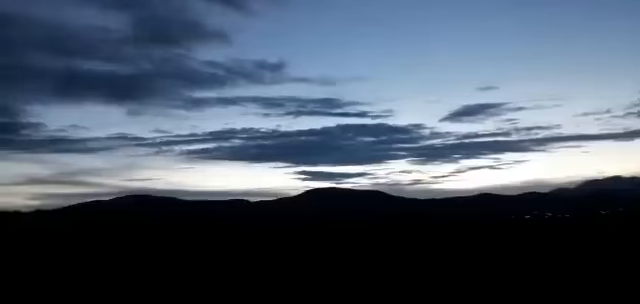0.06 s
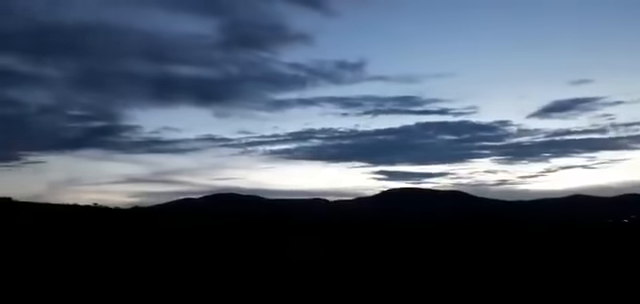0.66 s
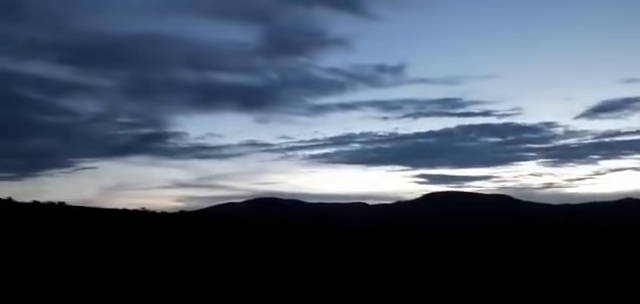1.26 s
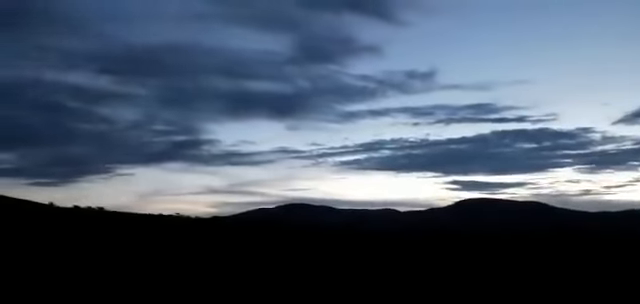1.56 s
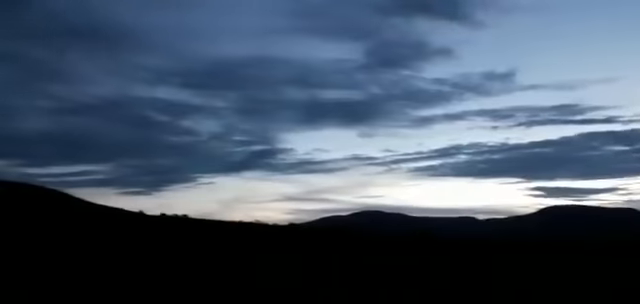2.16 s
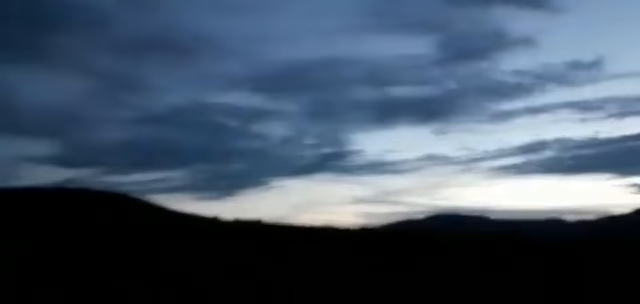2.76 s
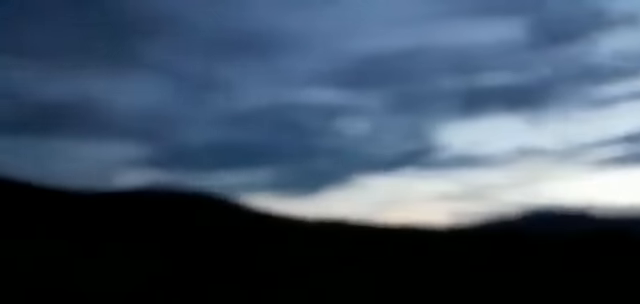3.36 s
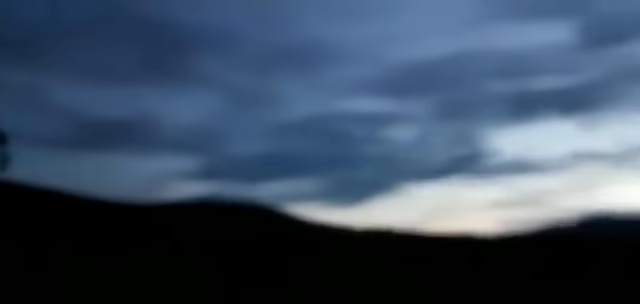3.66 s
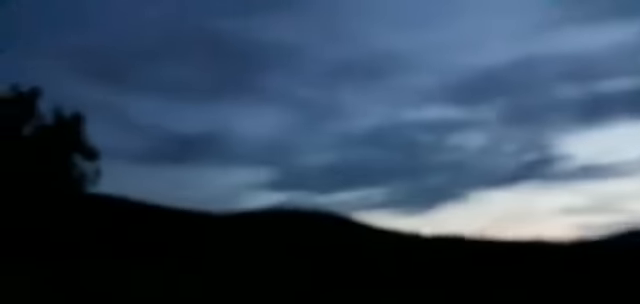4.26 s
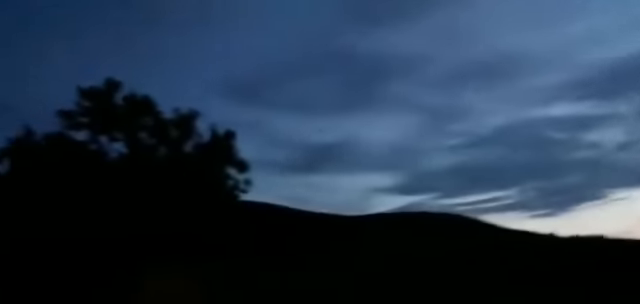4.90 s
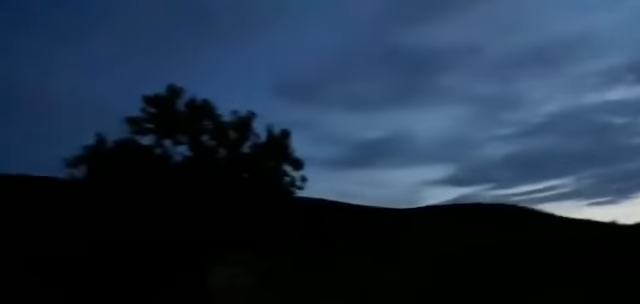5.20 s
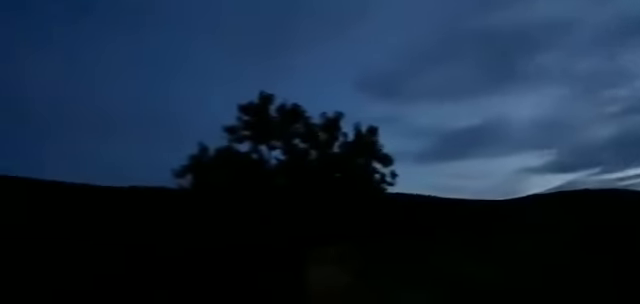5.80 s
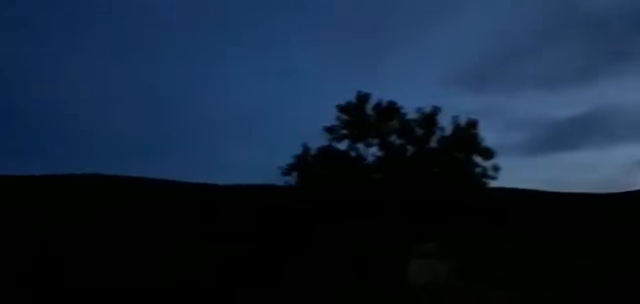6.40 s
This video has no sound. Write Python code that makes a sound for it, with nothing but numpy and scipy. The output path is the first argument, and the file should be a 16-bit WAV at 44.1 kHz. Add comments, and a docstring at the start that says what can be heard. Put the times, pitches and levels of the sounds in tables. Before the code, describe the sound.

A close bird opens with clear downward whistles, a fast trill and a string of short chips, lightly echoed by the surrounding hills. In the second half only farther birds remain, giving thin high chirps and a few faint mellow notes over a soft outdoor hiss. The hand-held microphone picks up occasional dull finger thuds, ticks and rubs, strongest just before the end.

```python
"""Open hill country at dawn, heard from a hand-held camera.
A near songbird sings falling whistles, a quick trill and a run of chips; others add high arches,
flicks and mellow notes over a far chorus. Each note is a gliding, nearly pure tone, echoed by ground
and trees. Underneath lie faint hiss and rumble, while fingers bump, rub and flex the camera case."""
import sys
import numpy as np
from scipy import signal
from scipy.fft import rfft, irfft
from scipy.io import wavfile

SR = 44100
rng = np.random.default_rng(int(sys.argv[2]) if len(sys.argv) > 2 else 0)


def master_out(mix):
    """Clip the mix to full scale and print it as 16-bit PCM to the path in sys.argv[1]."""
    frames = np.transpose(np.atleast_2d(mix))
    ceiling = np.clip(frames, -1, 1)
    pcm = np.round(ceiling * 32767).astype(np.int16)
    wavfile.write(sys.argv[1], SR, pcm)


N = 292824
T = np.arange(N) / SR


def undb(db):
    """Decibels to gain."""
    return 10 ** (np.asarray(db) / 20)


def unit(x):
    """Scale to rms 1."""
    return x / np.sqrt(np.mean(x ** 2))


def curve(rows):
    """Automation line through (time, value) breakpoints."""
    return np.interp(T, *np.transpose(rows))


def add(track, start_s, sound):
    """Mix a sound into a track."""
    i = int(np.clip(start_s * SR, 0, N - 1))
    track[i:i + len(sound)] += sound[:N - i]


def colour(x, points):
    """EQ through (frequency [Hz], gain [dB]) points."""
    hz, db = np.transpose(points)
    bins_hz = np.maximum(np.fft.rfftfreq(len(x), 1 / SR), 1)
    gain = undb(np.interp(np.log(bins_hz), np.log(hz), db))
    return irfft(rfft(x) * gain, len(x))


def resonate(x, hz, width_hz):
    """Two-pole resonance, gain 1 at the centre."""
    return signal.lfilter(*signal.iirpeak(hz, hz / width_hz, fs=SR), x)


def wander(rate_hz, size):
    """Smooth random drift with a spread near 1."""
    steps = np.arange(size) * rate_hz / SR
    return np.interp(steps, np.arange(size // 8), rng.standard_normal(size // 8))


def trees(x, t60, build_s=0.0063, lump_db=8):
    """Scatter from foliage and slopes: a dying tail in which a few trunks answer more strongly."""
    t = T[:SR]
    reflections = rng.standard_normal(SR) * undb(lump_db * np.minimum(rng.standard_normal(SR), 4))
    tail = reflections * undb(-60 * t / t60) * (1 - np.exp(-t / build_s))
    return signal.fftconvolve(x, tail / np.linalg.norm(tail))[:N]


# Tone of the open air (frequency [Hz], gain [dB])
AIR_EQ = [(15, -40), (25, -23.5), (66, -4), (122, 3), (215, -11), (1530, -19), (2360, -10.5), (3440, -6.5),
          (4380, 0.5), (5140, -8), (6380, -41), (8580, -22.5), (9810, -27.5), (11200, -23.5), (15500, -24)]


def countryside(air_db=-65, scoop_db=-3, rumble_db=-76, swell_db=0.5):
    """The bed: faint hiss, the blur of the farthest birds and a far-off rumble that swells a little."""
    air = unit(colour(rng.standard_normal(N), AIR_EQ)) * undb(air_db)
    air = colour(air, [(1800, 0), (2800, scoop_db), (4800, scoop_db), (6200, 0)])
    rumble = resonate(rng.standard_normal(N), hz=88, width_hz=60)
    rumble = resonate(rumble, hz=88, width_hz=90)
    return air + unit(rumble) * undb(rumble_db + swell_db * wander(2.3, N))


# Syllable palette (evenly spaced pitches [Hz], attack [share of note], release [share of note])
SLUR = ([8830, 6800, 5300, 4360, 3800, 3040], 0.078, 0.088)
SOFT_SLUR = ([7520, 6300, 5380, 4390, 3958, 3250], 0.47, 0.12)
CHIP = ([6180, 4720, 3990, 3402, 2870], 0.39, 0.27)
CHEEP = ([7560, 5600, 4253, 3774, 3395, 2780], .35, 0.19)
TRILL = ([4620, 3990, 3166, 2910, 2810, 2120], 0.29, 0.11)
UPSWEEP = ([6080, 6830, 7970, 8670, 8750], 0.14, 0.23)
DOWNSWEEP = ([9430, 8850, 8080, 6680, 4460, 3230], 0.23, 0.11)
FLICK = ([5255, 6530, 7530, 8580, 8740], 0.22, 0.048)
DIP = ([4928, 3496, 2952, 2762, 2984, 3576, 5100], 0.15, 0.12)
HOOK = ([4733, 6150, 5780, 4710, 4450, 4416, 4430], 0.12, 0.27)
WARBLE = ([2435, 2133, 1974, 1980, 2120], 0.035, 0.24)
# Whistles flare at two resonances, near 4.4 and 7.5 kHz (pitch [Hz], gain [dB])
FLARE = [(2000, -16), (2800, -16.5), (3300, -10), (3750, -7.5), (4050, -0.5), (4450, 2.5), (4800, -1),
         (5350, -4.5), (6050, -9), (6800, -5), (7500, 2), (8250, -3.5), (9000, -14)]


def whistle(shape, length_s, ratio, db, waver=0.0069, bend=0.011, flutter_db=3.5, octave_db=-39, flare=1):
    """One syllable: a gliding tone with a faint octave, flaring as it crosses the resonances."""
    path_hz, attack, release = shape
    u = np.linspace(0, 1, int(length_s * SR))
    glide = ratio * np.interp(u, np.linspace(0, 1, len(path_hz)), path_hz)
    pitch = glide * (1 + waver * wander(400, len(u)) + bend * wander(90.1, len(u)))
    phase = 2 * np.pi * np.cumsum(pitch) / SR
    fades = np.clip(np.minimum(u / attack, (1 - u) / release), 0, 1) ** 2
    envelope = fades * undb(flare * np.interp(pitch, *np.transpose(FLARE)))
    gain = envelope / envelope.max() * undb(db + flutter_db * wander(250, len(u)))
    octave = undb(octave_db) * (pitch < SR / 4) * np.sin(2 * phase)  # muted where it would alias
    return gain * (np.sin(phase) + octave)


def sing(*parts, **voice):
    """Whistle (syllable, cue list) pairs onto one track."""
    out = np.zeros(N)
    for shape, notes in parts:
        for start_s, *note in notes:
            add(out, start_s, whistle(shape, *note, **voice))
    return out


def repeat(run, first_db, fade_db, count, swell_db=0, lag_s=0):
    """Cue list for a fading run of notes; the bird may swell midway and drag at the very end."""
    start_s, period_s, length_s, ratio = run
    u = np.linspace(0, 1, count)
    times = start_s + period_s * np.arange(count) + lag_s * u ** 6
    levels = first_db + fade_db * u + swell_db * np.sin(np.pi * u)
    return [(s, length_s, ratio, db) for s, db in zip(times, levels)]


# Fader ride of the far chorus (time [s], relative level [dB])
CHORUS_RIDE = [(0.0, -55.5), (0.92, -52.5), (1.35, -58.5), (1.94, -55), (2.48, -51), (2.81, -57),
               (3.88, -60.5), (5.27, -60.5), (5.46, -68), (6.64, -63.5)]


def far_chorus(count=420, gain_db=-1.95, scatter_db=-6, spread_db=9, t60=0.96):
    """Many distant birds twitter short syllables at random pitches, blurred by foliage."""
    shapes = [CHIP, DIP, SOFT_SLUR, CHEEP, HOOK, DOWNSWEEP, HOOK, FLICK]
    twitter = np.zeros(N)
    for k, (when, length, pitch, loud) in enumerate(rng.random((count, 4))):
        note = whistle(shapes[k % len(shapes)], .018 + .04 * length, .78 + .42 * pitch, spread_db * loud,
                       bend=0.02176, flutter_db=3, flare=0.35)
        add(twitter, (k + when) / count * N / SR, note)
    blurred = 1.4 * twitter + trees(twitter, t60=.09)  # many near-equal paths through the leaves
    wet = blurred + undb(scatter_db) * trees(blurred, t60)
    # distance dulls the highest notes
    distant = colour(wet, [(1800, -3), (2650, -5.5), (3400, 4), (4300, 3.5), (5200, 5), (6300, -12),
                           (8300, -17.5), (10000, -24.5)])
    return unit(distant) * undb(curve(CHORUS_RIDE) + gain_db)


# Fader ride of the treble sizzle (time [s], relative level [dB])
SIZZLE_RIDE = [(0.0, -63), (1.52, -71.5), (1.83, -60.5), (2.12, -69.5), (2.53, -59.5), (4.01, -89.5),
               (5.27, -62.5), (5.47, -74.5), (6.64, -67.5)]


def sizzle(flicker_db=3, gain_db=-3):
    """The highest twitter blurs into a flickering band of noise."""
    band_eq = [(4000, -18.5), (6000, -1.5), (8400, -3), (9800, -24), (12000, -39)]
    band = unit(colour(rng.standard_normal(N), band_eq))
    return band * undb(curve(SIZZLE_RIDE) + gain_db + flicker_db * wander(40, N))


# Mid-distance calls (time [s], length [s], pitch [ratio], level [dB])
FLICKS = [(.008, 0.02, 0.78, -51), (0.256, .026, 0.89, -50), (1.079, 0.022, .96, -48.5),
          (1.09, 0.021, 0.96, -49.5), (1.199, .028, 1, -49.5), (2.081, 0.022, 1, -47),
          (2.86, 0.043, 0.43, -51), (3.992, .073, .48, -49), (4.152, 0.031, 0.97, -56.5),
          (5.005, 0.038, 0.99, -48), (5.029, 0.028, 0.94, -48.5), (5.063, 0.063, 0.93, -51.5),
          (5.979, .028, 0.73, -54.5)]  # quick and rising
DIPS = [(0.015, 0.13, 0.95, -49), (0.274, 0.06, 1.1, -44.5), (3.186, 0.055, 1.17, -48.5),
        (4.208, 0.04, 1.94, -45.5), (5.478, 0.047, 1.55, -57)]  # down and up again
HOOKS = [(0.8, 0.049, 0.99, -45.5), (1.022, .075, .96, -57), (1.128, 0.072, 0.83, -47),
         (1.18, .085, .98, -51), (1.615, .06, 1.02, -51), (4.957, 0.058, 1.02, -46.5),
         (5.206, .066, 1, -34), (6.061, 0.026, 1, -53.5), (6.569, 0.099, 1.09, -54)]  # curling over, then settling
ANSWERS = [(2.25, .085, 1.5, -57), (2.665, 0.052, 0.93, -49), (2.987, 0.051, 1.13, -53.5),
           (3.667, .06, 0.88, -52.5), (4.36, 0.049, 1.2, -57), (5.344, 0.057, 1.4, -55.5),
           (5.934, 0.038, 1.4, -53.5)]  # single chips
# High arches, a rising whistle and then a plunge (time [s], level [dB])
ARCHES = [(1.669, -45.5), (2.404, -46), (5.713, -47)]
# Runs on one syllable (time [s], period [s], note length [s], pitch [ratio])
PLUNGE_RUN = (2.70, .126, .083, .93)
FLICK_RUN = (3.218, .09, .032, .99)
FAR_CHIP_RUN = (3.265, .091, .048, 1.04)
DIP_RUN = (6.226, .072, .04, 1.48)


def other_birds(scatter_db=-7, t60=0.25, ground_db=-10, ground_s=.0023, sweep_s=.095, gap_s=.041):
    """Slightly reedy sweeps and purer hooks from further off, so wetter, with a bounce off the ground."""
    rises = [(s, sweep_s, 1, db) for s, db in ARCHES]
    plunges = [(s + sweep_s + gap_s, sweep_s, 1, db) for s, db in ARCHES]
    plunge_run = repeat(PLUNGE_RUN, first_db=-59.5, fade_db=-2.5, count=4, lag_s=.01)
    flick_run = repeat(FLICK_RUN, first_db=-59, fade_db=-1.5, count=4)
    chip_run = repeat(FAR_CHIP_RUN, first_db=-53, fade_db=-5, count=4)
    dip_run = repeat(DIP_RUN, first_db=-53.5, fade_db=-2.5, count=6)
    reedy = sing((UPSWEEP, rises), (DOWNSWEEP, plunges + plunge_run), (FLICK, FLICKS + flick_run),
                 (DIP, DIPS + dip_run), (CHIP, ANSWERS + chip_run), octave_db=-28, flare=0.7)
    song = reedy + sing((HOOK, HOOKS))
    out = song + undb(scatter_db) * trees(song, t60)
    add(out, ground_s, undb(ground_db) * song)
    return out


# Lead song (time [s], length [s], pitch [ratio], level [dB])
SLURS = [(0.093, 0.15, 0.99, -29.5), (.33, .16, 1, -32)]  # long falling whistles
CHEEPS = [(0.546, 0.055, 0.99, -32), (0.673, 0.061, 0.9, -32), (.785, 0.063, 0.92, -32)]  # sharp pickups into the trill
SOFT_SLURS = [(1.443, .13, 0.96, -37.5), (1.636, 0.15, 0.97, -36.5), (1.876, 0.15, 0.97, -33.5)]  # falling whistles with a soft attack
# Its trill and chips (time [s], period [s], note length [s], pitch [ratio])
TRILL_RUN = (.8367, .0383, .027, 1)
CHIP_RUN = (2.085, .085, .044, 1)
# Early reflections off ground and bushes (delay [s], level [dB])
NEAR_ECHOES = [(.0031, -26), (.0085, -14.5), (0.019, -21)]


def near_bird(scatter_db=-17, t60=0.94, treble_db=-6):
    """The foreground singer, with distinct near echoes that beat against its glides."""
    trill = repeat(TRILL_RUN, first_db=-41.5, fade_db=-1.5, count=7, swell_db=3)
    chips = repeat(CHIP_RUN, first_db=-34.5, fade_db=-0.5, count=7, swell_db=3, lag_s=.013)
    song = sing((SLUR, SLURS), (CHEEP, CHEEPS), (TRILL, trill), (SOFT_SLUR, SOFT_SLURS), (CHIP, chips))
    tail = colour(trees(song, t60), [(5000, 0), (7000, treble_db)])  # long paths lose their treble
    out = song + undb(scatter_db) * tail
    for delay_s, db in NEAR_ECHOES:
        add(out, delay_s, undb(db) * song)
    return out


# Finger hits (time [s], thud peak [dB], contact pitch [Hz])
BUMPS = [(.368, -55, 283), (1.094, -42, 486), (1.374, -42.5, 1050), (1.763, -44.5, 281),
         (1.833, -55.5, 300), (2.250, -42, 453), (3.045, -36.5, 1950), (4.622, -42.5, 347),
         (4.681, -44, 292), (4.762, -43.5, 372), (4.996, -51.5, 380), (5.130, -36.5, 315),
         (5.263, -43, 387), (5.693, -46, 238), (5.797, -40, 337), (6.383, -31, 770), (6.405, -32.5, 1030)]
# Body resonances of the case (frequency [Hz], width [Hz], gain [dB])
CASE_MODES = [(145, 59, 16.5), (298, 280, 11.5), (517, 620, 0.5), (1100, 400, -24), (1780, 2500, -8)]
# Tone of skin on the case (frequency [Hz], gain [dB])
SCUFF_EQ = [(60, -1.5), (250, -3), (600, 1), (1300, -2.5), (2500, 3), (4500, -0.5), (8000, -2),
            (10500, -18.5), (15000, -37)]


def finger_bumps(scuff_s=0.016, scuff_db=-33.5, scuff_growth=0.57, rattle_db=-33, rattle_s=0.019):
    """A finger meets the case: a dull thud, a brief rattle in the grip and a scuff of skin."""
    out, t = np.zeros(N), T[:4096]
    for start_s, db, contact_hz in BUMPS:
        rattle = undb(rattle_db) * rng.standard_normal(len(t)) * np.exp(-t / rattle_s)
        force = signal.unit_impulse(len(t)) + rattle
        body = sum(undb(mode_db) * resonate(force, hz, width) for hz, width, mode_db in CASE_MODES)
        # a softer contact pushes longer and favours the lower resonances
        softened = signal.sosfilt(signal.butter(2, 2 * contact_hz, fs=SR, output="sos"), body)
        thud = resonate(softened, contact_hz, 0.8 * contact_hz)
        scuff = unit(colour(rng.standard_normal(len(t)), SCUFF_EQ)) * np.exp(-t / scuff_s)
        scuff_gain = undb(scuff_db + scuff_growth * db)  # grows more slowly than the thud
        add(out, start_s, undb(db) * thud / np.abs(thud).max() + scuff_gain * scuff)
    return out


# Mellow background notes (time [s], length [s], pitch [ratio], relative level [dB])
MELLOW_NOTES = [(0.388, 0.14, 1, -59.5), (1.124, .1, .97, -60.5), (2.378, 0.09, 1.01, -64),
                (2.755, .073, 0.98, -67), (3.299, .16, 1.15, -69), (3.599, 0.0736, 1.19, -62.5),
                (4.09, .13, 1.18, -65.5), (6.27, 0.062, .98, -67)]


def mellow_bird(gain_db=-3, scatter_db=-2, t60=0.64):
    """Low fluting notes from far away, wavering and half lost in their own echo."""
    song = sing((WARBLE, MELLOW_NOTES), waver=0.032)
    return undb(gain_db) * (song + undb(scatter_db) * trees(song, t60))


def swells(moves, depth_db=20):
    """Envelope of hand moves: each climbs by depth_db over its rise and sinks as far over its fall."""
    return sum(undb(db - depth_db * np.maximum((peak_s - T) / rise_s, (T - peak_s) / fall_s))
               for peak_s, rise_s, fall_s, db in moves)


# Finger slides (peak time [s], rise [s], fall [s], level [dB])
SLIDES = [(.75, 0.03, 0.59, -55.5), (1.19, 0.19, 0.099, -63.5), (2.465, 0.061, .04, -62.5),
          (6.39, 0.094, 0.075, -50)]
# Small ticks of the case (time [s], peak level [dB])
TICKS = [(.753, -40), (.780, -36), (.831, -40), (.887, -38.5), (2.295, -43), (3.241, -46), (4.997, -44.5),
         (6.350, -39)]
# Their bright tone (frequency [Hz], gain [dB])
TICK_EQ = [(200, -15), (1000, -8), (2500, -2), (4500, 0), (8000, 0), (10000, -20), (15000, -32)]


def finger_rubs(tick_s=0.0019, grain_db=6):
    """Sliding fingers rasp in tiny slips, and the case ticks under their pressure."""
    slips = rng.standard_normal(N) * undb(grain_db * wander(500, N))
    out = unit(colour(slips, SCUFF_EQ)) * swells(SLIDES)
    t = T[:1024]
    for start_s, db in TICKS:
        tick = colour(rng.standard_normal(len(t)), TICK_EQ) * np.exp(-t / tick_s)
        add(out, start_s, undb(db) * tick / np.abs(tick).max())
    return out


# Flexes of the case (peak time [s], rise [s], fall [s], level [dB])
FLEXES = [(1.3, 0.45, 2, -78.5), (4.75, 0.35, 2.2, -74), (5.87, 0.22, .11, -61.5), (6.55, .5, 0.66, -77)]


def grip():
    """The turning hand flexes the case with a dull rumble."""
    rumble_eq = [(20, -26), (45, -15), (65, 1.5), (140, -9.5), (300, -30), (1000, -47)]
    return unit(colour(rng.standard_normal(N), rumble_eq)) * swells(FLEXES)


def scene(hiss_db=-89):
    """Birds, handling and bed all sit dead centre; only a trace of hiss gives width."""
    birds = near_bird() + other_birds() + mellow_bird() + far_chorus() + sizzle()
    handling = finger_bumps() + finger_rubs() + grip()
    mid = birds + handling + countryside()
    hiss_eq = [(60, 12.5), (400, 8), (1500, 4), (5000, -21), (9000, 6), (15000, -1.5)]
    side = undb(hiss_db) * unit(colour(rng.standard_normal(N), hiss_eq))
    return np.array([mid + side, mid - side])


def record(dry, top_hz=15750):
    """The camera cuts the top with a steep low-pass."""
    return signal.sosfilt(signal.ellip(8, .2, 70, top_hz, fs=SR, output="sos"), dry)


dry = scene()
out = record(dry)
master_out(out)
```